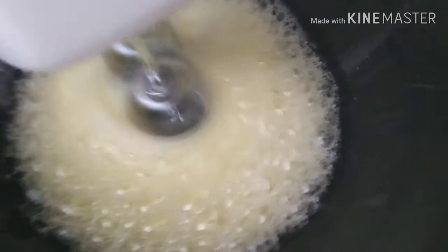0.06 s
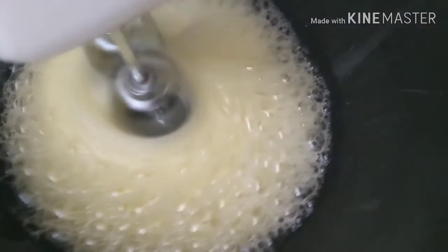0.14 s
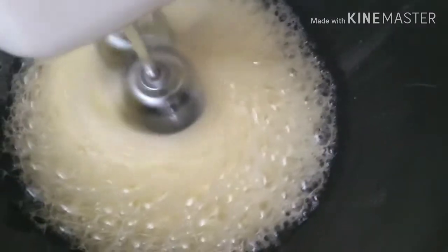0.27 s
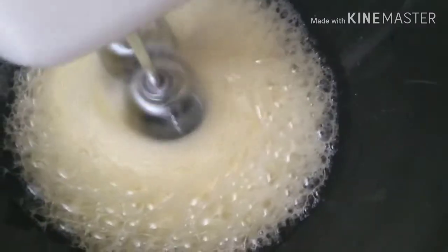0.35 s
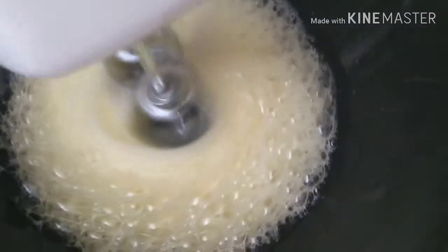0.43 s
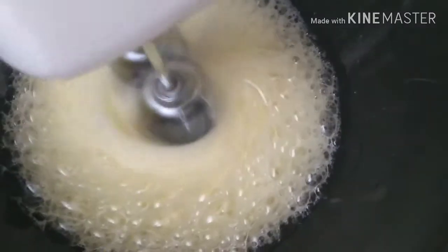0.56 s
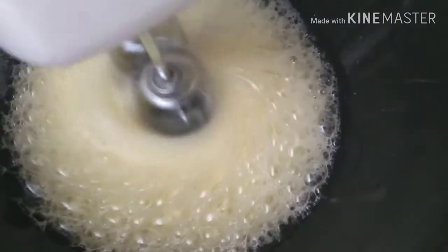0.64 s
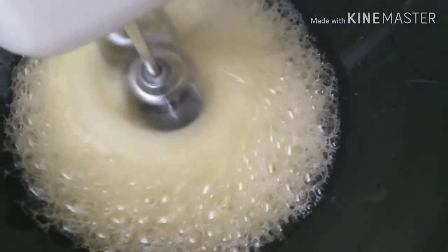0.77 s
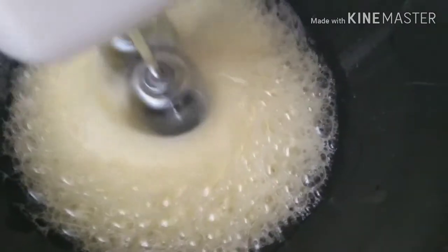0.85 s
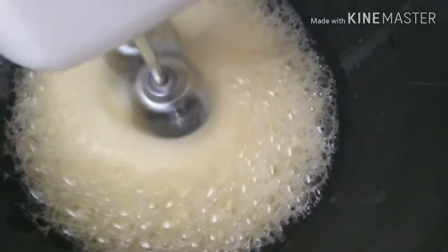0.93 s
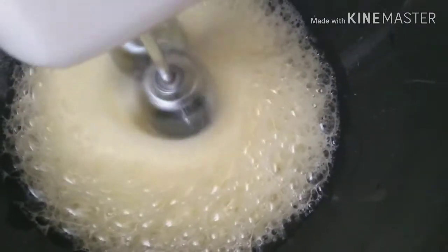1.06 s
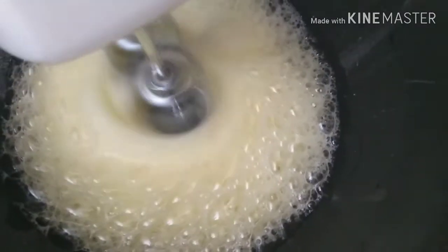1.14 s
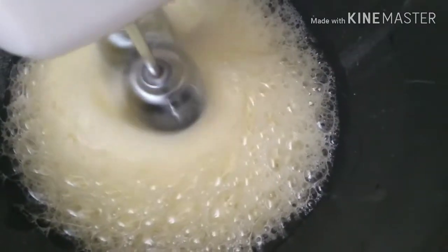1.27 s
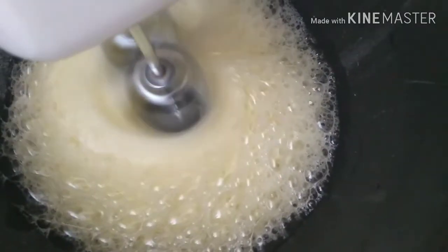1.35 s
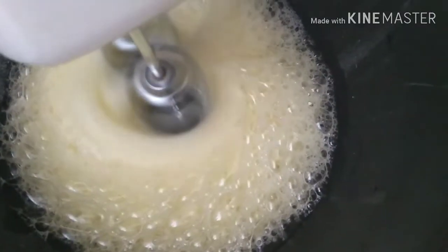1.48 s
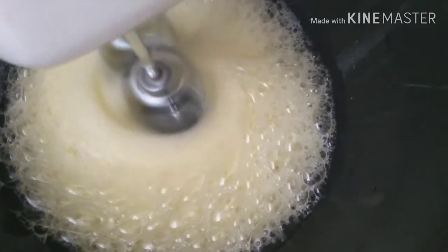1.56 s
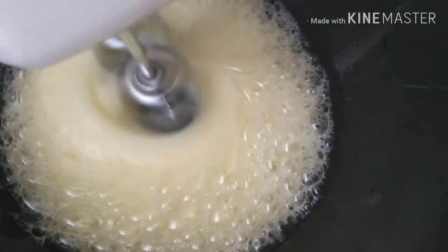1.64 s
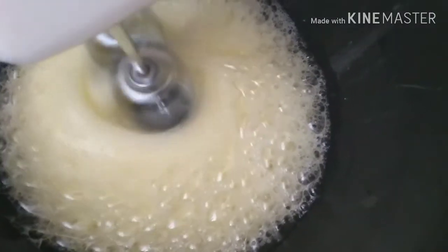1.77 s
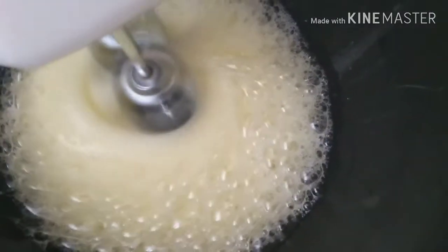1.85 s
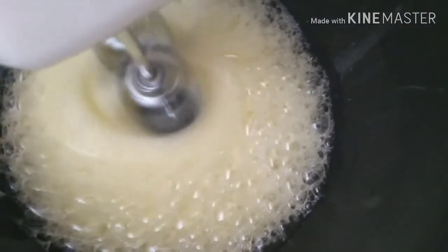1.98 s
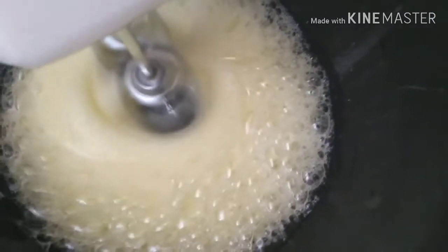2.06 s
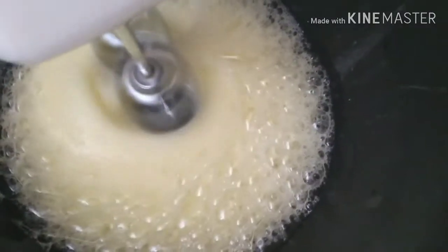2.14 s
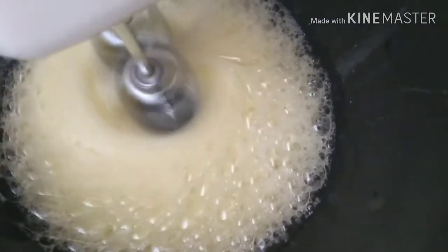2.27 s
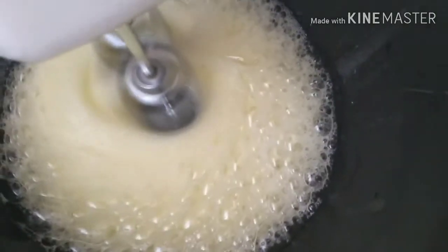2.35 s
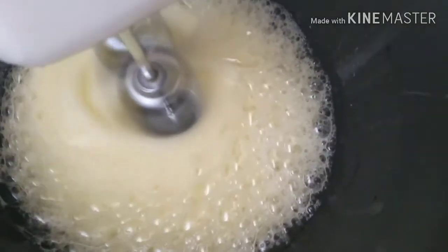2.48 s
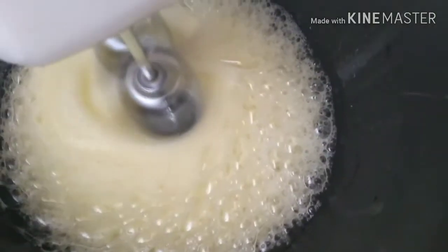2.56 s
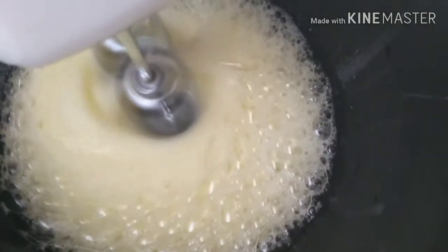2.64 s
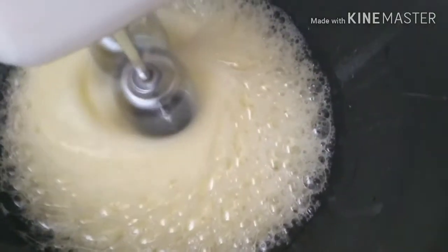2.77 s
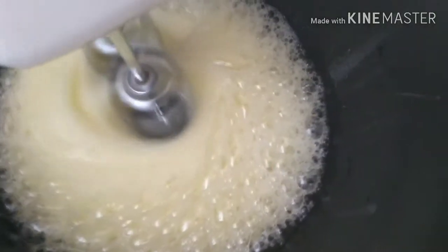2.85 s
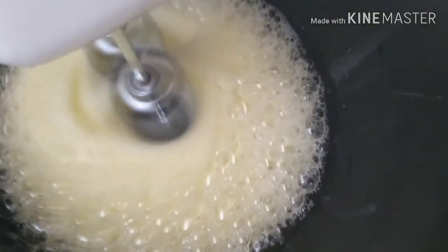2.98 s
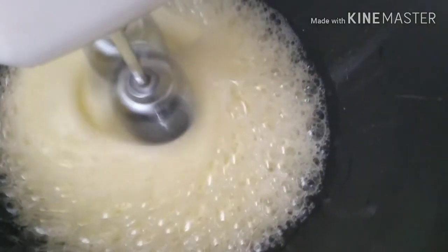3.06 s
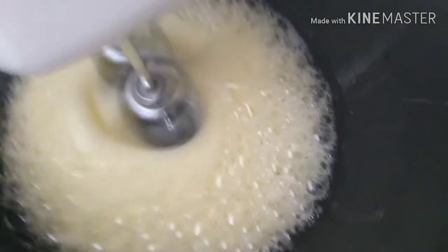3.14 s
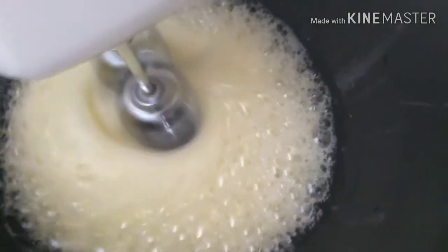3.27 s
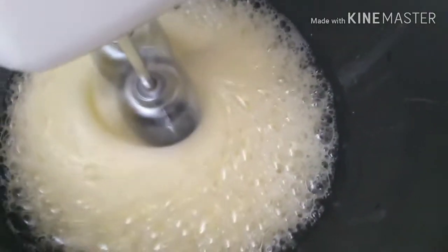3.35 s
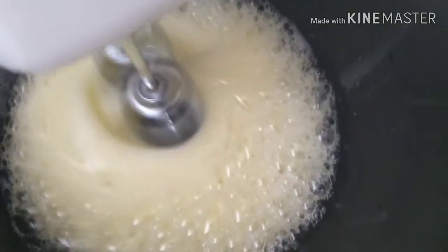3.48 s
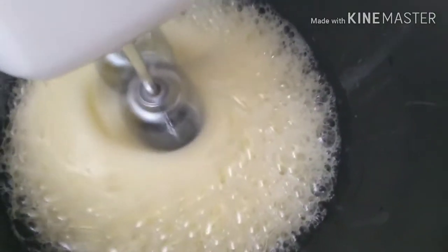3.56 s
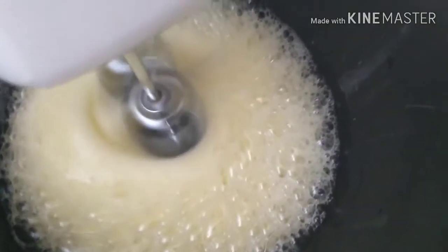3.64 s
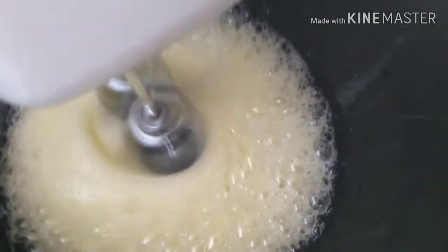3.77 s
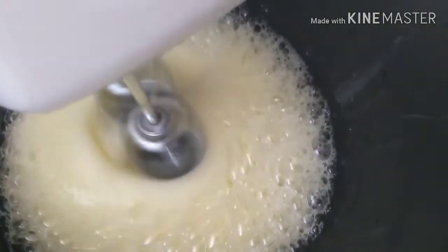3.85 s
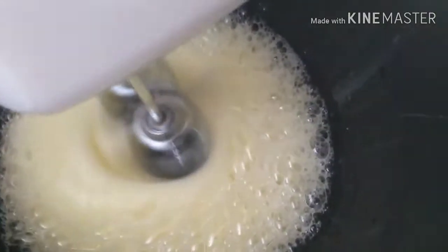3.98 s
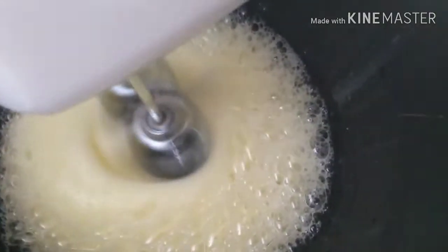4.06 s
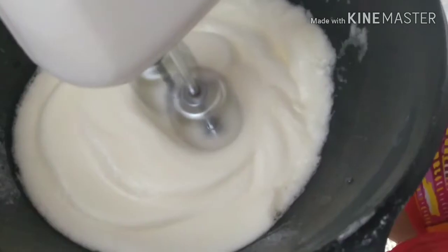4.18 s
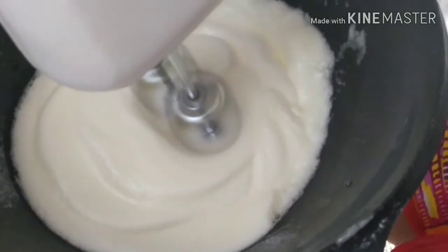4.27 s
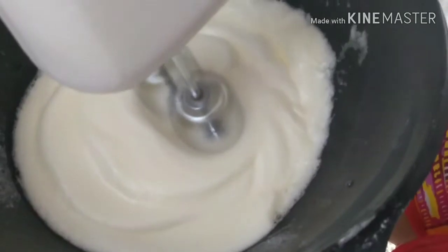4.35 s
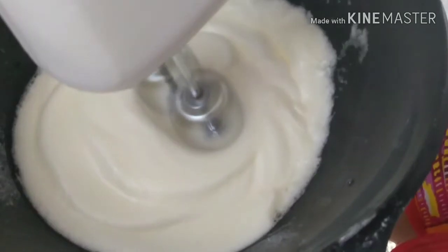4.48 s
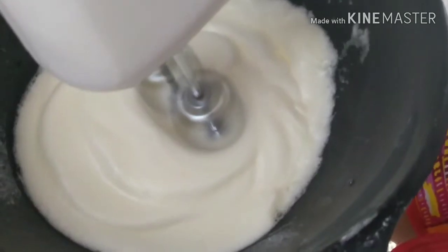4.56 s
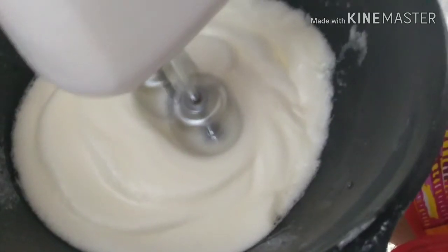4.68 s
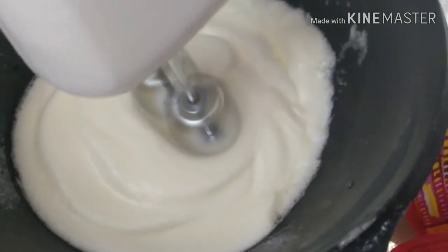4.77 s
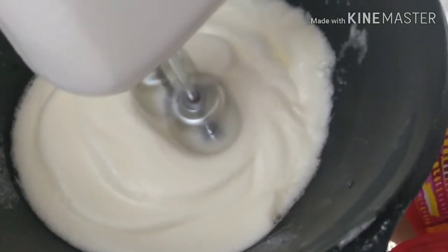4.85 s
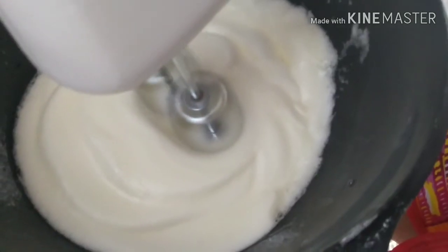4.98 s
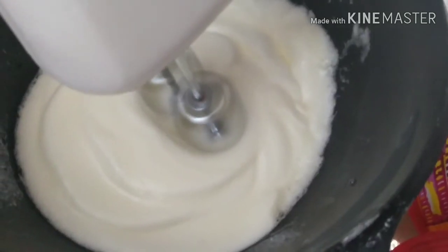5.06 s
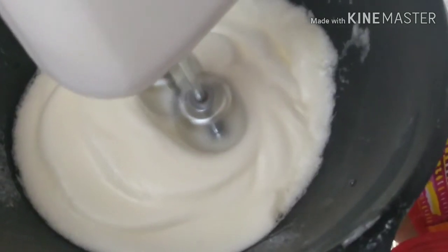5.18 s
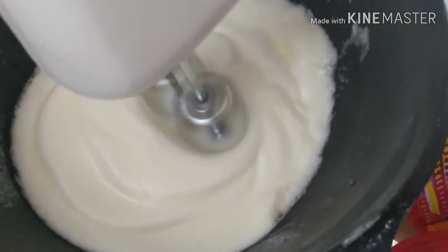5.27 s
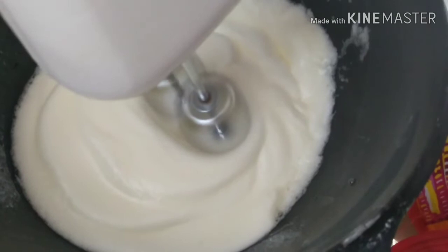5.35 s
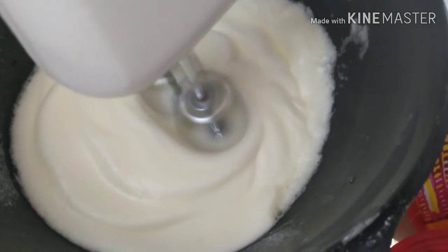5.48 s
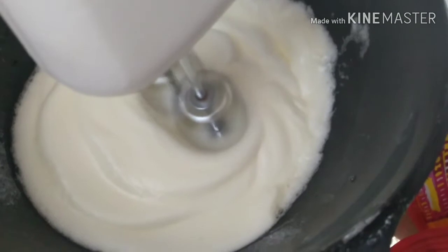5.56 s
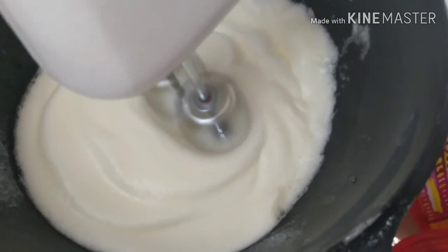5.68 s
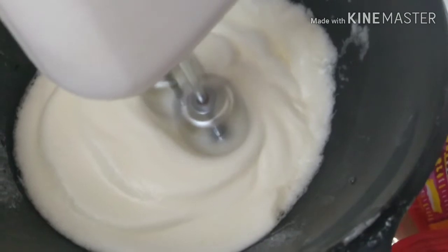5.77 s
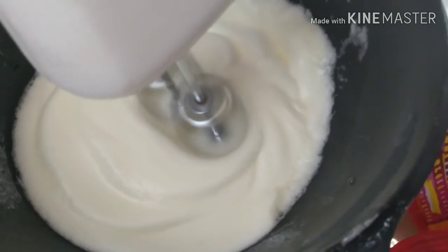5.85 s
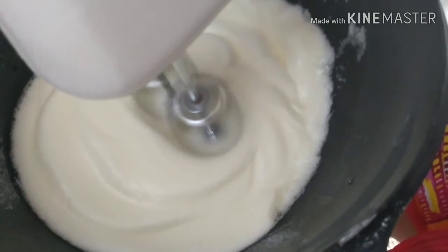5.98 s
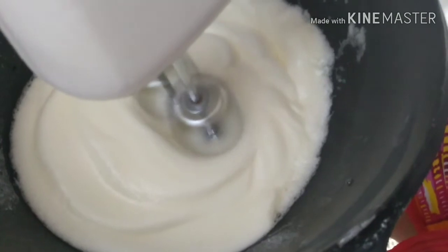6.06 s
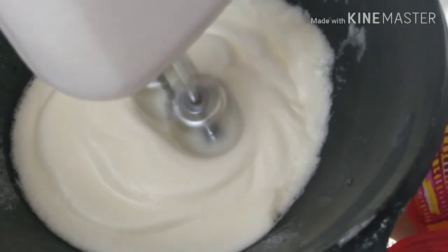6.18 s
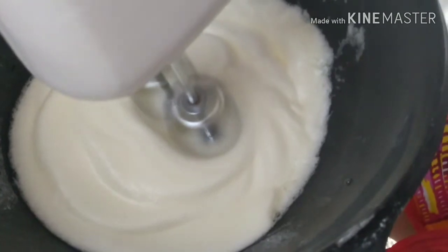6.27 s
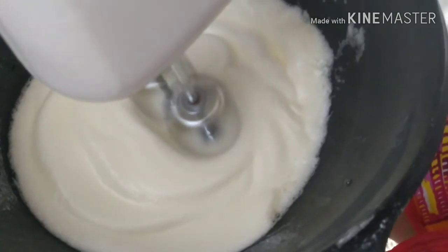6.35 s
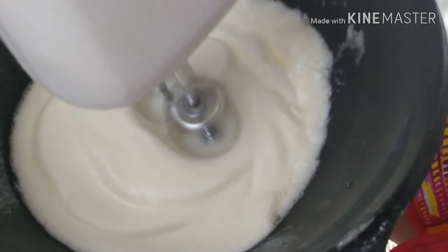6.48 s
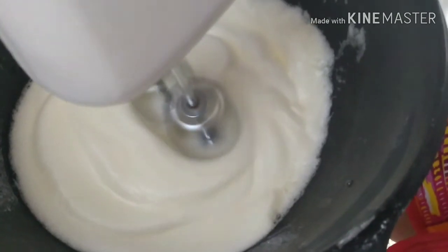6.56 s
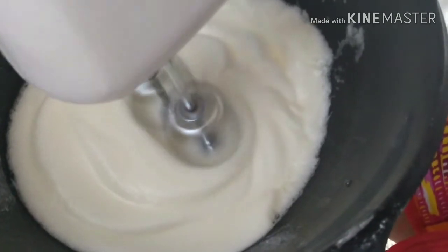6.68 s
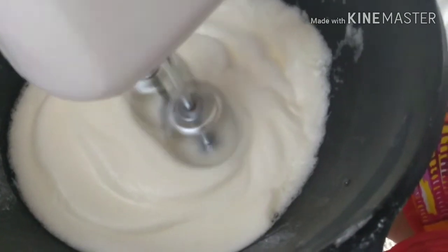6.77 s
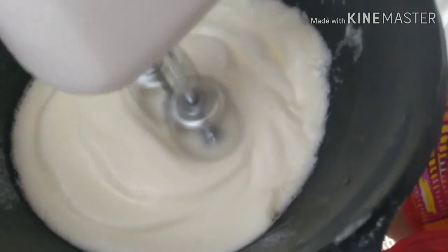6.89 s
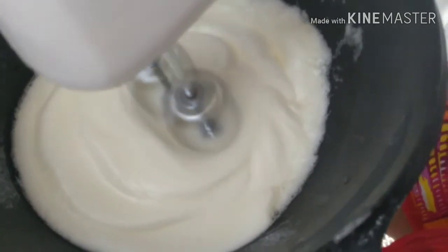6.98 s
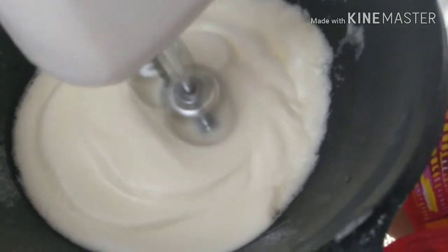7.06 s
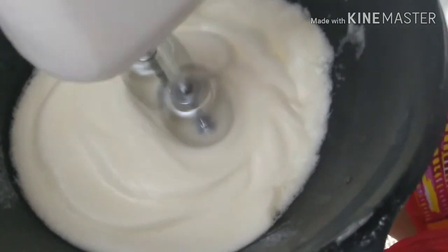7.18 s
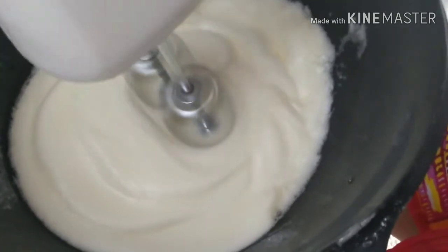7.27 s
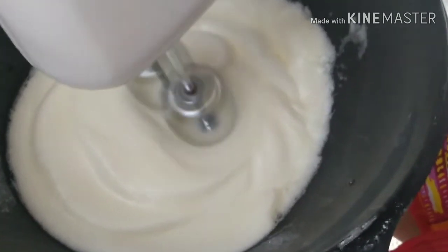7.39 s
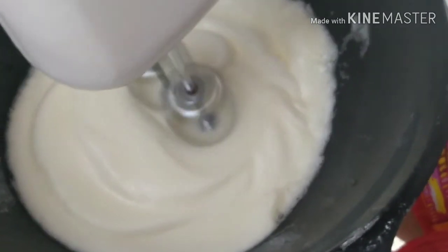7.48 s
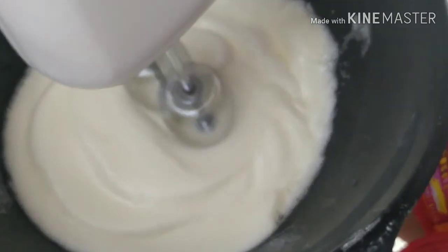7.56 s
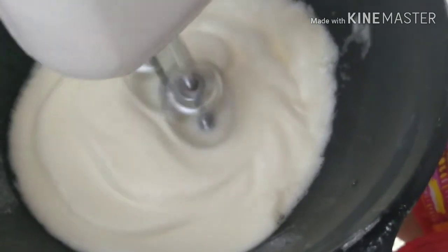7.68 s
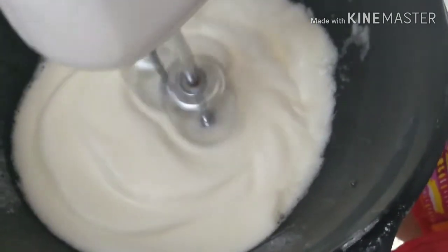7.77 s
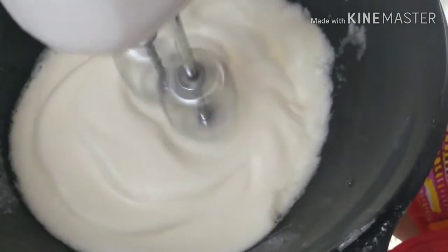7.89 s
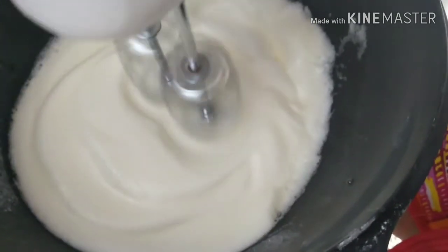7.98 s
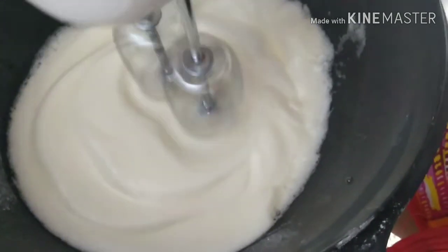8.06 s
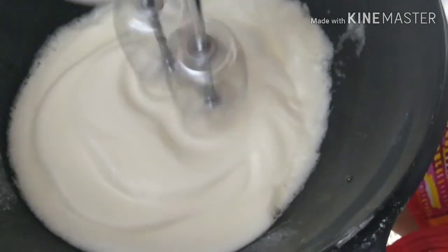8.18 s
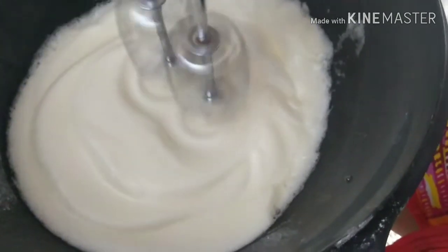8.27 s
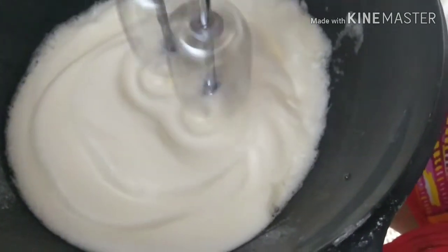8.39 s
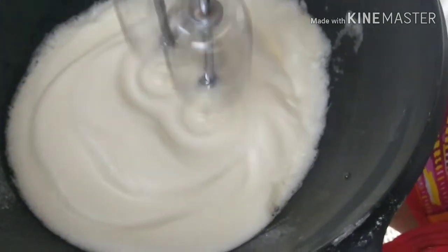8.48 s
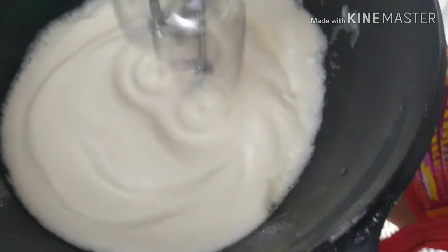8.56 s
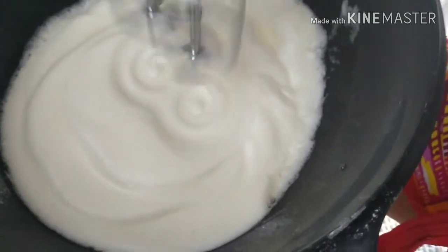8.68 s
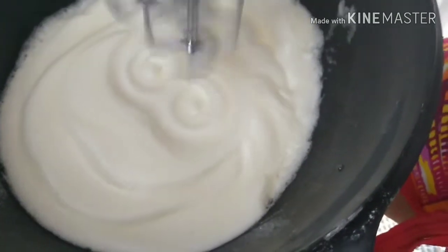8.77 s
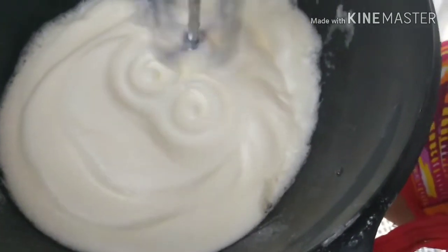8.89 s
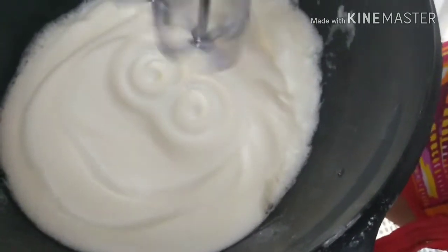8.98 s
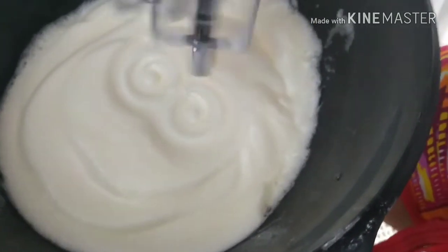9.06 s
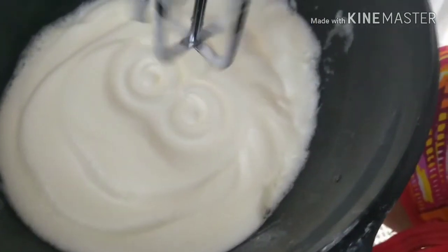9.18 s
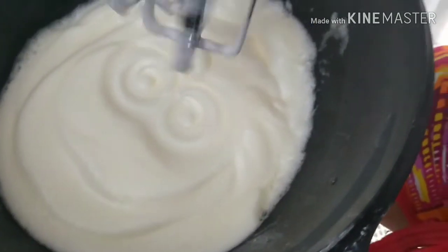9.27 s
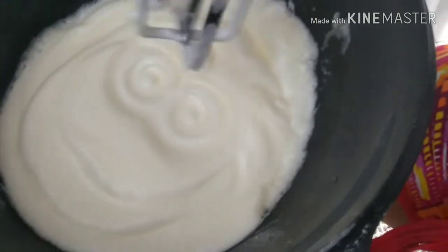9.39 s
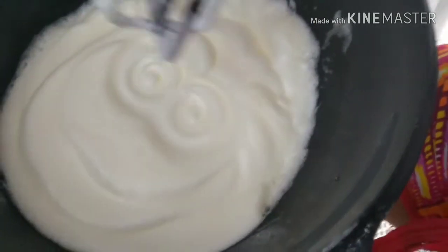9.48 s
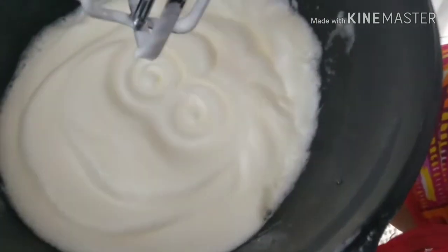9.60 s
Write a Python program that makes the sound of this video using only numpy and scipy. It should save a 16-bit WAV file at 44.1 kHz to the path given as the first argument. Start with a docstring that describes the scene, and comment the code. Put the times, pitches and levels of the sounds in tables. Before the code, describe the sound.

Very close in a kitchen, a hand mixer whips egg whites with a steady mid-pitched motor drone, rough gear roar and thin bright whistles. A tiny silent gap at about four seconds leads to a slightly higher, hissier tone with soft handling bumps. At seven seconds it is switched off with a thud, and the whine slides down to a faint low room hum.

```python
"""A kitchen: a hand mixer whips egg white in a bowl, close to a phone with two microphone ports.
Thin froth first; after a short cut stiff foam, heard from another side; then the motor coasts down.
The armature sings as a sine at its turning rate, with gear lines, shell-coloured multiples and whistles.
Shaped noise makes the roar of gears and housing and the hiss of fan and brushes.
Decaying sines make the bumps and a tick; soft noise and a swelling low hum make the room."""
import sys
import numpy as np
from scipy import signal
from scipy.fft import rfft, irfft, next_fast_len
from scipy.io import wavfile
from scipy.ndimage import uniform_filter1d, map_coordinates

SR = 44100
rng = np.random.default_rng(int(sys.argv[2]) if len(sys.argv) > 2 else 0)


def wav_out(sig):
    """Save sig, one row per channel (or a flat mono array), as 16-bit PCM at SR to the path in sys.argv[1]."""
    wavfile.write(sys.argv[1], SR, np.round(np.clip(np.atleast_2d(sig).T, -1, 1) * 32767).astype(np.int16))


N = 424683

# armature speed under power, froth then foam: t/s, turning rate/Hz
SPEED = [(0, 371.8), (0.6, 371.5), (1.2, 373.1), (2.6, 373.0), (4.14, 374.5), (4.15, 383.3), (4.8, 383.7),
         (5.5, 382.8), (6.6, 383.5), (6.96, 383.2)]
# tone levels, the drone from the first row on: t/s, drone level/dB, low orders level/dB, high orders level/dB
COASTING = [(6.95, -25, -75, -80), (7.04, -27, -43, -49), (7.14, -36, -43, -48), (7.22, -40, -41, -47),
            (7.4, -46, -52, -49), (7.6, -46, -45, -48), (7.74, -46, -47, -49), (7.82, -46, -39, -49),
            (8.02, -49, -44, -49), (8.2, -54, -43, -48), (8.36, -56, -45, -49), (8.55, -57, -43, -46),
            (8.75, -57, -47, -46), (9.02, -58, -50, -50), (9.2, -85, -66, -70), (9.63, -99, -90, -95)]
# drone between the ports, a row for froth and one for foam: near minus far level/dB, far lag/rad
DRONE_PORTS = [(7, 0.021), (7, 0.21)]
# each beater turn rocks the worm gear: shaft order, beater turns added, froth level/dB, foam level/dB
# (levels before the load and the port tilt)
GEAR = [(0, 8, -54, -68), (0, 10, -56, -68), (0, 12, -54, -64), (1, -3, -46, -47), (1, -2, -50, -46),
        (1, -1, -44, -48), (1, 1, -48, -42), (1, 2, -50, -46), (1, 5, -44, -47), (1, 7, -46, -48),
        (2, -3, -50, -46), (2, -2, -46, -53), (2, -1, -54, -43), (2, 1, -53, -45), (2, 3, -55, -50),
        (3, -3, -55, -45), (3, -1, -53, -41), (3, 1, -53, -42), (3, 2, -55, -46), (3, 3, -55, -45),
        (4, -2, -54, -51), (4, -1, -58, -47), (2, 0, -46, -54), (3, 0, -45, -45), (4, 0, -55, -45),
        (5, 0, -50, -54)]
# how the shell radiates a tone: f/Hz, level/dB
HOUSING = [(100, -20), (200, -12), (260, -9), (310, -2), (350, 7), (400, 8), (430, 3), (465, 8), (520, 3),
           (590, -1), (670, -1), (720, 7), (780, -11), (870, -6), (970, 4), (1050, -6), (1120, -2),
           (1200, 3), (1300, 6), (1400, 3), (1550, -9), (2400, -10), (3000, -1), (3300, 0), (3620, 6),
           (3900, 1), (4400, -8), (5200, -3), (5700, -5), (6100, -8), (6700, 3), (7200, -5), (7750, 5),
           (8500, -8), (9200, 7), (9900, -9), (10900, 1), (11600, -3), (12400, -1), (13200, -7),
           (14200, -12)]
# relative levels of shaft orders 2 to 12: level/dB
LOW_ORDERS_DB = [3, 1, -1, -7, -3, -8, -11, -7, -8, -6, -4]
# thin whistles at and beside slot and fan orders: multiple of turning rate, start t/s, end t/s, mean level/dB
WHISTLES = [(16, 0, 7, -52), (21, 0, 4.1, -59), (22, 0, 4.1, -60), (24, 0, 7.2, -49), (25, 0, 7, -55),
            (32, 0, 4.1, -58), (33, 0, 4.1, -57), (35, 0, 4.1, -58), (36, 4.2, 7, -62), (37, 0, 4.1, -62),
            (24.064, 0, 4.1, -55), (25.064, 2.45, 4.1, -46), (21.968, 4.2, 7, -60), (22.968, 4.2, 7, -55),
            (23.968, 4.2, 7, -56), (24.968, 4.2, 7, -58)]
# relative spectrum of the gearbox roar, a list for froth and one for foam: f/Hz, level/dB per Hz
ROAR = [
    [(25, -19), (60, -11), (200, -10.5), (330, 0), (430, -1), (480, 2.5), (590, -5.5), (720, -5), (880, -7),
     (1100, -4), (1420, -8), (1530, -7), (1650, -9), (1900, -5.5), (2050, -19.5), (2300, -11),
     (2800, -16.5), (3200, -20), (3600, -32), (5000, -28.5), (9000, -72)],
    [(25, -29), (60, -17), (200, -30.5), (330, 0.5), (480, 0.5), (600, -6), (800, -4.5), (980, -1),
     (1150, 1), (1300, 2.5), (1420, -5), (1520, -8), (1900, 0), (2150, -14.5), (2400, -18), (2850, -5),
     (3300, -30), (3650, -7.5), (4100, -23), (4600, -7), (5300, -55), (9000, -62)],
]
# relative spectrum of fan and brush hiss, a list for froth and one for foam: f/Hz, level/dB per Hz
HISS = [
    [(1500, -31), (3500, -0.5), (5000, -0.5), (6000, -7.5), (6700, -0.5), (7500, -8), (9300, -0.5),
     (9900, -0.5), (11500, -2.5), (12500, -2), (14200, -9)],
    [(1500, 3), (3500, 3.5), (5000, 0), (6000, -3), (6700, 4.5), (7500, -7.5), (8800, 4.5), (9600, -11.5),
     (10500, 1.5), (11500, -3), (12500, -6.5), (14200, -9.5)],
]
# noise at the two ports, a list for each position: f/Hz, likeness 0-1, near minus far level/dB, far lag/rad
PORTS = [
    [(50, 1, 0, 0), (250, .83, 2, 0), (490, .83, 3, -.1), (775, .47, 5, -.5), (950, .4, 3, -2),
     (1075, .5, -1, -2.2), (1250, .45, 2, -1.7), (1600, .22, 1, -2), (2000, .2, 2, -3), (2500, .2, 0, -5.2),
     (3600, .1, -2, -5), (4600, .15, -3, -6.3), (5500, .45, -1, -9.4), (6650, .4, -2, -12.3),
     (8250, .15, -1, -12.5), (14000, .15, 2, -12.5)],
    [(50, .97, -1, 0), (250, .7, 1, .2), (490, .8, 4, 0), (775, .65, 7, 0), (925, .45, 5, -.4),
     (1075, .4, 1, -2.3), (1250, .4, 5, -1), (1500, .5, 2.5, -1.9), (2000, .5, 1.5, -1.9),
     (2250, .1, 0, -5), (2850, .4, 6, -5), (3200, .55, 1, -6.3), (3800, .2, 4, -7.6), (4600, .4, -1, -5.7),
     (5500, .2, 0, -4), (6650, .7, 0, -5.8), (7400, .1, 1, -5.3), (14000, .17, 0, -6)],
]
# sudden dips that creep back, negative for a rise: t/s, nominal depth level/dB
DIPS = [(0.0, 0.5), (0.28, 2.5), (0.55, 2), (0.9, 1), (1.19, 3), (1.43, 3), (1.8, 0), (2.0, 2.5),
        (2.72, 3.5), (3.05, 1.5), (3.98, 2), (7.22, 1), (8.25, 0), (8.6, 5.5), (9.05, -3.5)]
# fingers bump the phone at one port: t/s, nominal level/dB, twice the settled f/Hz
BUMPS = [(4.209, -29, 110), (4.271, -14.5, 130), (4.313, -28, 120), (4.361, -29, 90), (4.395, -29, 100),
         (4.486, -28, 100), (4.52, -23, 80), (4.72, -28, 89.5), (4.79, -34, 100), (4.84, -33, 60),
         (4.91, -35, 60), (5.08, -27, 150), (5.21, -32, 80), (5.245, -29, 110), (5.275, -32, 70),
         (5.96, -34, 90), (6.148, -24, 130), (6.645, -32, 110), (6.855, -31, 100), (6.9, -27, 110),
         (7.228, -8, 115)]
# low hum before its swell: f/Hz, level/dB
HUM = [(52, -50), (56, -48), (113, -49)]
# gain of the hum, which rises late: t/s, level/dB
HUM_SWELL = [(0, -55), (7.3, -29), (7.5, -13), (7.82, -8), (7.9, 6), (9.63, 7)]
# relative spectrum of the room floor: f/Hz, level/dB per Hz
KITCHEN = [(25, -27), (60, -14), (150, -2), (400, -10.5), (1000, -10.5), (3000, -27), (14000, -54)]
# gain through the cut between the two positions: t/s, level/dB
CUT = [(4.087, -0.5), (4.09, -25), (4.105, -34), (4.115, -120), (4.168, -120), (4.174, -34), (4.19, 0)]
# stereo widening: f/Hz, share of the other port taken off
CROSS = [(50, .95), (1000, .85), (2100, .99), (3200, 1), (4200, .74), (5300, .9), (6200, .58), (7300, .86),
         (8300, .42), (9500, .5), (12000, .25), (14000, .2)]
# delay of that copy in the two positions: t/s
CROSS_S = [.000481, .000466]

GEAR_RATIO, SLOTS = 21.55, 12  # armature turns per beater turn, armature slots
DRONE_DB, ROAR_DB, HISS_DB = [-23, -24], [-27.5, -28.5], [-36, -32]  # under power: froth, foam
# switch off; air drag slows the rotor first, rubbing at the last
OFF_S, DRAG_S, BRAKE_HZ_PER_S = 6.957, 1.366, 127
EASE_S, EASE_HZ_PER_S2 = 8.4, 9  # the rubbing lets go a little as the rotor nearly stops
# noise while coasting: offset in dB that eases in at the switch, dB for each dB of speed
ROAR_SLOWS, HISS_SLOWS, UNLOAD_S = (-0.87, 1.39), (-4, 1.35), 0.21
RAGGED_DB, RAGGED_RAD = 1.8, .3  # the loose rotor makes each low order stutter in level and phase
RATTLE_TOP_HZ = 1900  # the loose rotor shakes the shell only below about this
WHINE_LOW_HZ = 2000  # the higher orders die away as they sink below this
FAN_ORDER, FAN_DB, FAN_FADES = 16, 10, 2  # level over the higher orders, dB lost for each dB of speed
ROAR_WAVER_DB, ROAR_PATCH_DB = .8, .8  # random unsteadiness, depth of patches
PATCH_HZ, PATCH_S = 400, .05  # size of a louder or softer patch in the noise
DIP_FALL_S, DIP_BACK_S = 0.0075, 0.083
CUT_S, FADE_DB, FADE_S = 4.14, 13, 0.1  # after the cut the level creeps back up from below
TICK_S, TICK_DB, TICK_HZ, TICK_T60_S = 7.178, -33, 2700, .07
TOP_HZ = 14240  # nothing passes above this
T = np.arange(N) / SR
LATE = T > CUT_S  # the foam, heard from the second position
FFT_SIZE = next_fast_len(N + 8192)
FFT_HZ = np.fft.rfftfreq(FFT_SIZE, 1 / SR)


def mixer():
    """One armature angle drives the tones and, through the gears, the throb of the noise."""
    speed = turning()
    angle = 2 * np.pi * np.cumsum(speed + .3 * wobble(10)) / SR
    tones = drone(angle) + gears(speed, angle) + whine(speed, angle)
    return amp(dips()) * (tones + roar(speed, angle) + hiss(speed, angle))


def turning():
    """Turns a second: held by the drive, then lost to drag and at last to rubbing."""
    (driven,) = curves(SPEED)
    knee = BRAKE_HZ_PER_S * DRAG_S  # the speed where drag hands over to rubbing
    knee_s = OFF_S + DRAG_S * np.log(driven[-1] / knee)
    dragged = driven[-1] * np.exp((OFF_S - T) / DRAG_S)
    rubbed = knee - BRAKE_HZ_PER_S * (T - knee_s)
    free = np.where(T < knee_s, dragged, rubbed)
    free += EASE_HZ_PER_S2 * np.maximum(T - EASE_S, 0) ** 2
    return np.where(T < OFF_S, driven, np.maximum(free, 1))


def drone(angle):
    """The armature sings one sine a turn, slightly unsteady in level and phase."""
    tilt_db, lag = drone_ports()
    level = amp(drone_level() + tilt_db + 0.27 * wobble(25))
    return level * np.sqrt(2) * np.sin(angle + lag + 0.084 * wobble(30))


def drone_level():
    """Drone level in dB: steady under power, then falling in the coast."""
    return np.where(T < COASTING[0][0], by_stage(DRONE_DB), curves(COASTING)[0])


def drone_ports():
    """Level tilt in dB and phase shift in radians, shared evenly between the ports."""
    return [by_stage(column) * [[.5], [-.5]] for column in np.transpose(DRONE_PORTS)]


def gears(speed, angle):
    """Beater turns rock the worm gear and set lines beside the first shaft orders."""
    level_db = drone_level()
    slip = angle / GEAR_RATIO + 0.11 * wobble(3.066)
    lines = np.zeros(N)
    for order, side, *stage_db in GEAR:
        phase = rng.uniform(0, 2 * np.pi)
        lines += amp(by_stage(stage_db)) * np.sin(order * angle + side * slip + phase)
    # the teeth follow the drone, and unload when the drive is off
    load = (speed / speed.max()) ** 6 * amp((level_db - level_db.max()) * 0.16)
    tilt_db, _ = drone_ports()
    return lines * load * amp(tilt_db)


def whine(speed, angle):
    """The shell radiates multiples of the turning rate; thin whistles join outside its resonances."""
    _, low_db, high_db = curves(COASTING)
    high = high_orders(speed, angle) + fan_whistle(speed, angle)
    shaken = high * amp(high_db) + low_orders(speed, angle) * amp(low_db)
    total = filtered(shaken, amp(along(HOUSING, FFT_HZ))) + whistles(angle)
    return np.array([total, .55 * np.roll(total, 3)])


def high_orders(speed, angle):
    """Orders at and beside multiples of the slot rate stand out; each group of four flickers."""
    order = np.arange(SLOTS + 1 + 120)
    off_slot = np.abs((order + SLOTS // 2) % SLOTS - SLOTS // 2)
    db = np.choose(np.minimum(off_slot, 2), [3, -5, -11]) - .16 * order
    db += np.where((order % 4 == 0) & (off_slot > 0), 4, 0)
    phases = np.exp(2j * np.pi * rng.random(len(order)))
    lines = amp(db + rng.normal(0, 0.39, len(order))) * phases
    size = 8192  # points in one turn
    turn = angle / (2 * np.pi) % 1 * size
    # the four orders of a group lie six apart
    groups = order[SLOTS + 1:].reshape(-1, 4, 6).transpose(0, 2, 1).reshape(-1, 4)
    high = np.zeros(N)
    for group in groups:
        shape = irfft(np.where(np.isin(order, group), lines, 0), size) * size / 2
        audible = group[-1] * speed < SR * .66
        sinking = 1 + (WHINE_LOW_HZ / (group.mean() * speed)) ** 4
        wave = np.interp(turn, np.arange(size), shape, period=size)
        high += amp(1.5 * wobble(13)) * audible / sinking * wave
    return high


def fan_whistle(speed, angle):
    """The fan's own whistle, a flickering sine that weakens with the speed."""
    level = amp(FAN_DB + 1.5 * wobble(14)) * (speed / speed.max()) ** FAN_FADES
    return level * np.sin(FAN_ORDER * angle)


def low_orders(speed, angle):
    """The loose rotor shakes the shell at its first multiples, stuttering in level and phase."""
    low = np.zeros(N)
    for k, db in enumerate(LOW_ORDERS_DB, start=2):
        wave = np.sin(k * angle + RAGGED_RAD * wobble(35))
        low += amp(db + RAGGED_DB * wobble(22)) * wave / (1 + (k * speed / RATTLE_TOP_HZ) ** 6)
    return low


def whistles(angle):
    """Thin sines locked to the turning rate, each wavering in level through its own span."""
    total = np.zeros(N)
    for multiple, start, end, db in WHISTLES:
        sounding = (T > start) & (T < end)
        total += amp(db + 3.8 * wobble(5)) * sounding * np.sin(multiple * angle)
    return total


def roar(speed, angle):
    """Gearbox noise throbs with each armature turn and with the beater wires passing."""
    beater = angle / GEAR_RATIO
    throb = 1 + .1 * np.sin(beater) + .18 * np.sin(2 * beater + 1) + .08 * np.sin(3 * beater)
    throb += .11 * np.sin(5 * beater) + .17 * np.sin(angle)
    level_db = slowing(speed, ROAR_DB, ROAR_SLOWS) + ROAR_WAVER_DB * wobble(8)
    return amp(level_db) * rush(ROAR, throb, ROAR_PATCH_DB)


def hiss(speed, angle):
    """Fan and brush noise flutters lightly with the armature and twice each beater turn."""
    flutter = 1 + 0.033 * np.sin(2 * angle / GEAR_RATIO) + 0.09 * np.sin(angle + 1)
    level_db = slowing(speed, HISS_DB, HISS_SLOWS) + 0.99 * wobble(10)
    return amp(level_db) * rush(HISS, flutter, patchy_db=2.0)


def slowing(speed, levels_db, law):
    """A noise level in dB: steady under power, then falling with the speed."""
    offset_db, slope = law
    off = 1 - np.exp(-np.maximum(T - OFF_S, 0) / UNLOAD_S)
    return by_stage(levels_db) + off * (offset_db + slope * 20 * np.log10(speed / speed.max()))


def dips():
    """Gain in dB on every mixer layer: quick dips that creep back, and the fade after the cut."""
    lost = np.zeros(N)
    for s, db in DIPS:
        since = np.maximum(T - s, 0)
        lost += db * (1 - np.exp(-since / DIP_FALL_S)) * np.exp(-since / DIP_BACK_S)
    return -lost - LATE * FADE_DB * np.exp(-np.maximum(T - CUT[-1][0], 0) / FADE_S)


def bumps():
    """Each knock is one short swing that slows as it dies, mostly at the near port."""
    out, t = np.zeros(N + SR), np.arange(SR // 16) / SR
    cycles_per_hz = t * 0.5 + 0.006 * (1 - np.exp(-t / 0.0042))
    for s, db, hz in BUMPS:
        swing = np.sin(2 * np.pi * hz * cycles_per_hz) * np.exp(-t / 0.0088)
        out[round(s * SR):][:len(t)] += amp(db) * swing
    return out[:N] * [[1], [-.1]]


def tick():
    """A small plastic tick just before the last bump: one short bright ring of the shell."""
    since = np.maximum(T - TICK_S, 0)
    return amp(TICK_DB - 60 * since / TICK_T60_S) * np.sin(2 * np.pi * TICK_HZ * since) * [[1], [.5]]


def kitchen():
    """The quiet room as soft noise, and a low hum whose close pair beats."""
    (swell_db,) = curves(HUM_SWELL)
    hum = np.zeros(N)
    for hz, db in HUM:
        hum += amp(db + 0.99 * wobble(5)) * np.sin(2 * np.pi * hz * T + 0.48 * wobble(6))
    floor = amp(-45.5) * rush([KITCHEN, KITCHEN], 1, patchy_db=1.5)
    return floor + amp(swell_db) * hum * [[1], [.8]]


def rush(spectra, beat, patchy_db):
    """Noise of rms 1 over both ports, times beat, part shared and part each port's own."""
    common, own = patchy(rng.standard_normal((2, N)), patchy_db) * beat
    both = []
    for spectrum, ports in zip(spectra, PORTS):
        like = np.clip(along(ports, FFT_HZ), 0, 1)
        tilt_db = np.outer([.5, -.5], along(ports, FFT_HZ, axis=2))
        colour = amp(along(spectrum, FFT_HZ) + tilt_db)
        lag = np.exp(-1j * np.outer([0, 1], along(ports, FFT_HZ, axis=3)))
        alone = colour * np.sqrt(1 - like)
        mix = filtered(common, colour * np.sqrt(like) * lag)
        mix += filtered(own, alone * [[1], [0]])
        mix += filtered(np.roll(own, N // 2), alone * [[0], [1]])  # half the length away: unlike the near port
        both.append(unit(mix))
    return by_stage(both)


def patchy(x, depth_db):
    """Noise with louder and softer patches in time and frequency."""
    z = signal.stft(x, nperseg=512)[2]
    field = rng.standard_normal(z.shape[1:])
    field = uniform_filter1d(field, round(PATCH_HZ * 512 / SR), 0)
    field = uniform_filter1d(field, round(PATCH_S * SR / 256), 1)
    return signal.istft(z * amp(depth_db * unit(field)), nperseg=512)[1][:, :N]


def amp(db):
    """Decibels to a linear gain."""
    return 10 ** (np.asarray(db) / 20)


def unit(x):
    """Scale to rms 1."""
    return x / np.sqrt(np.mean(x ** 2) + 1e-20)


def by_stage(pair):
    """The froth value before the cut, the foam value after it."""
    froth, foam = pair
    return np.where(LATE, foam, froth)


def along(points, hz, axis=1):
    """One column of a table that starts with f/Hz, read on a log frequency axis."""
    p = np.transpose(points)
    return np.interp(np.log(hz + 1), np.log(p[0] + 1), p[axis])


def curves(rows):
    """One value per sample for each column after the time."""
    s, *cols = np.transpose(rows)
    return [np.interp(T, s, c) for c in cols]


def wobble(rate):
    """A smooth random curve, rate knots a second."""
    return map_coordinates(rng.standard_normal(int(N * rate / SR) + 4), [T * rate])


def filtered(x, response):
    """Shape x by a complex response given at FFT_HZ."""
    return irfft(rfft(x, FFT_SIZE) * response, FFT_SIZE)[..., :N]


def scene():
    """The mixer, the knocks and the room at the two ports."""
    return mixer() + bumps() + tick() + kitchen()


def record(dry):
    """The phone widens the image by taking a late copy of the other port; a cut joins the positions."""
    share = np.clip(along(CROSS, FFT_HZ), 0, 1)
    copies = [filtered(dry[::-1], share * np.exp(-2j * np.pi * FFT_HZ * lag)) for lag in CROSS_S]
    (cut_db,) = curves(CUT)
    return filtered((dry - by_stage(copies)) * amp(cut_db), FFT_HZ < TOP_HZ)


dry = scene()
out = record(dry)
wav_out(out)
```